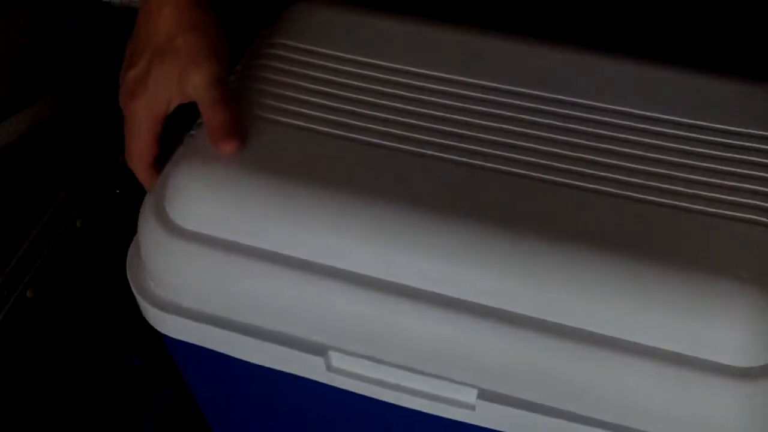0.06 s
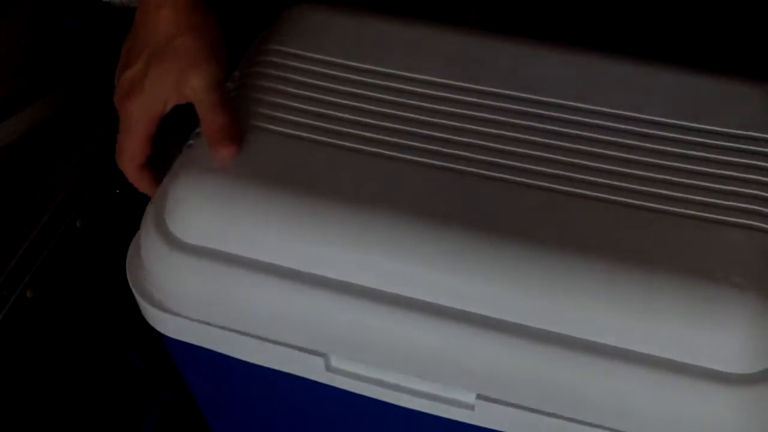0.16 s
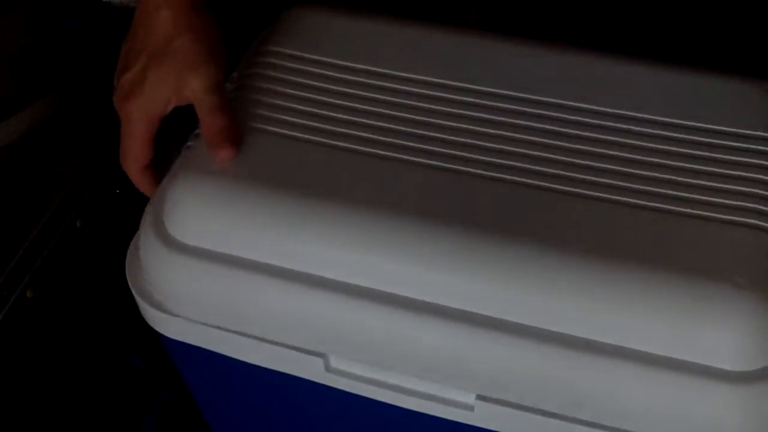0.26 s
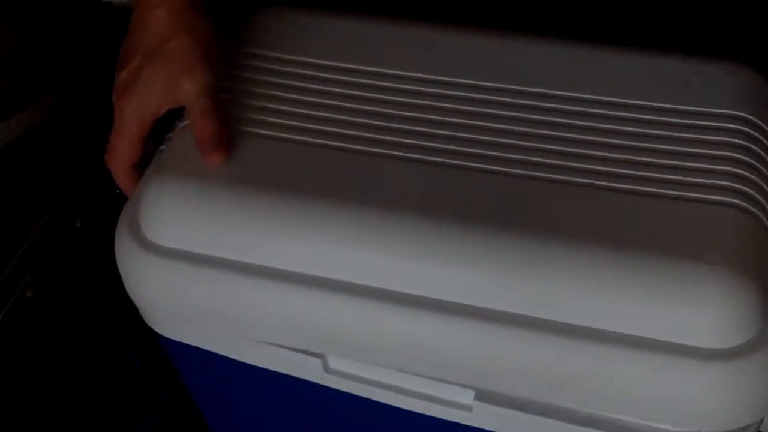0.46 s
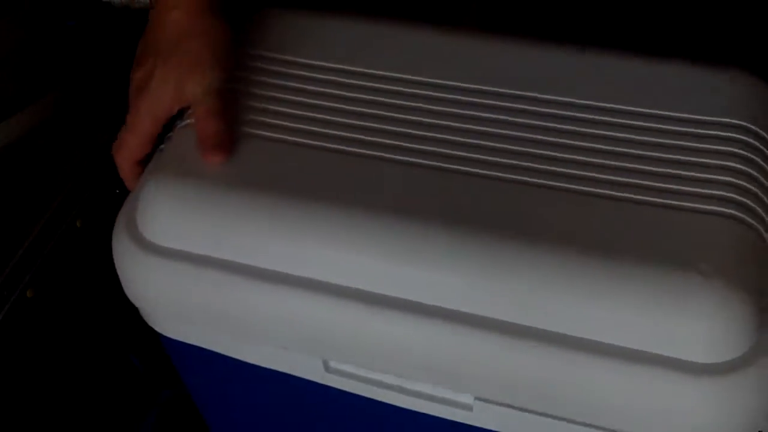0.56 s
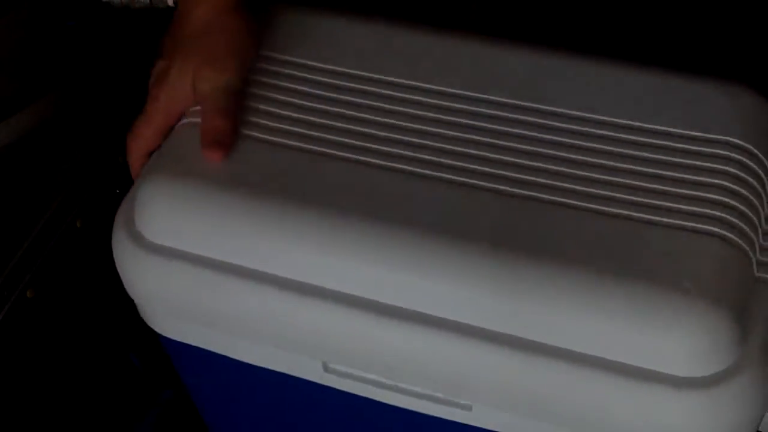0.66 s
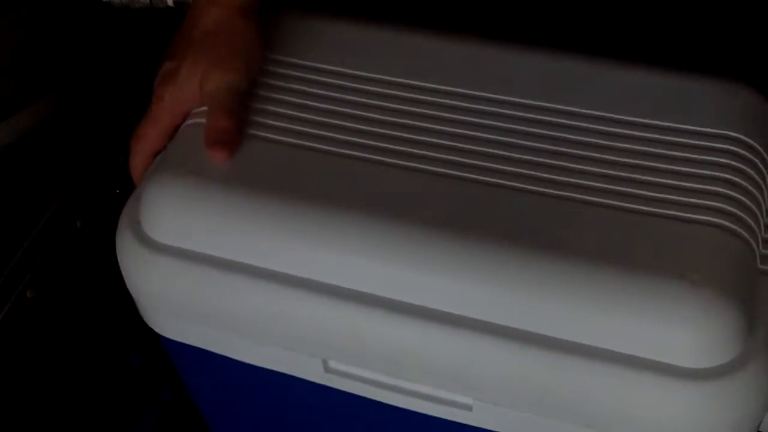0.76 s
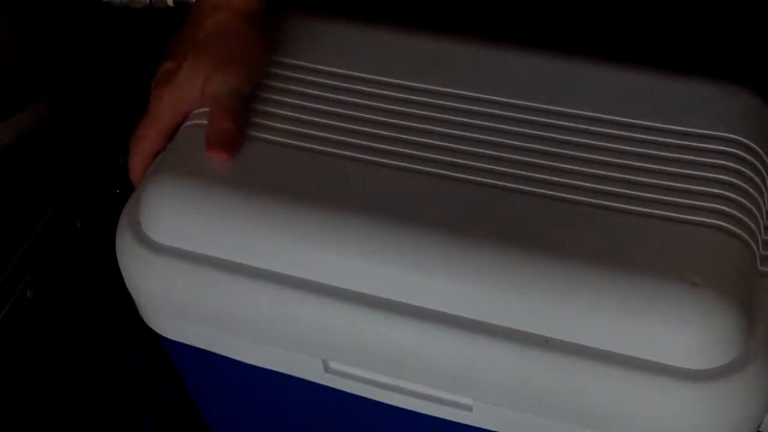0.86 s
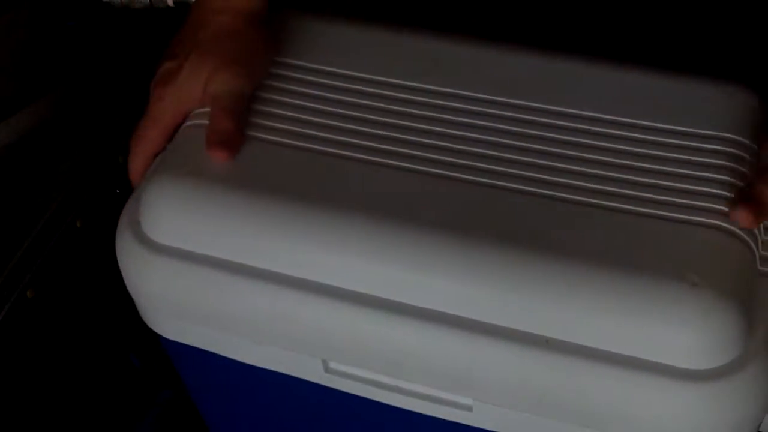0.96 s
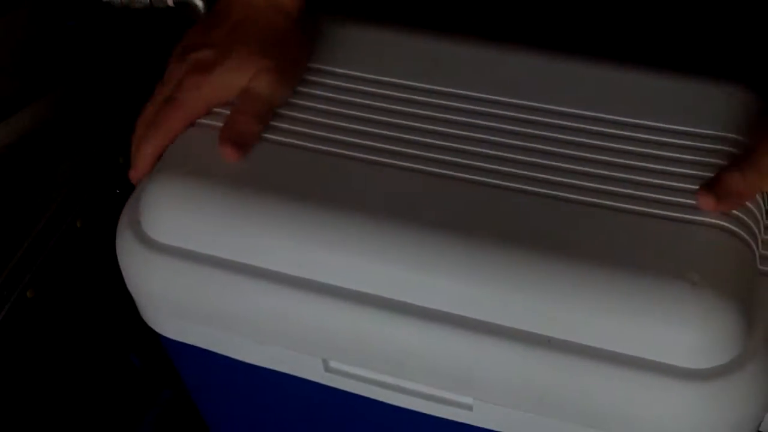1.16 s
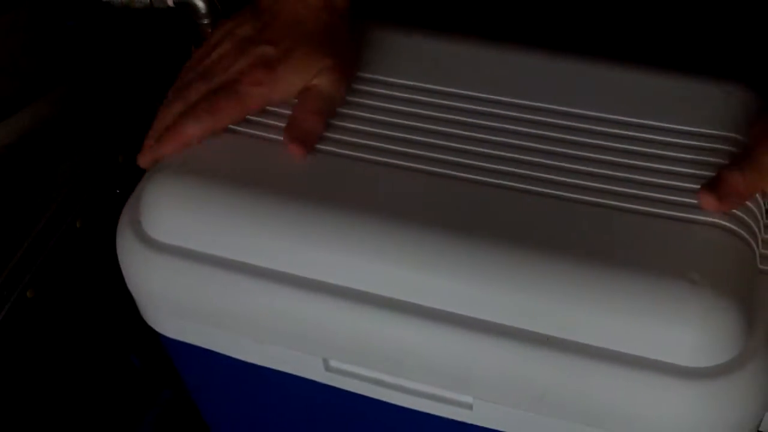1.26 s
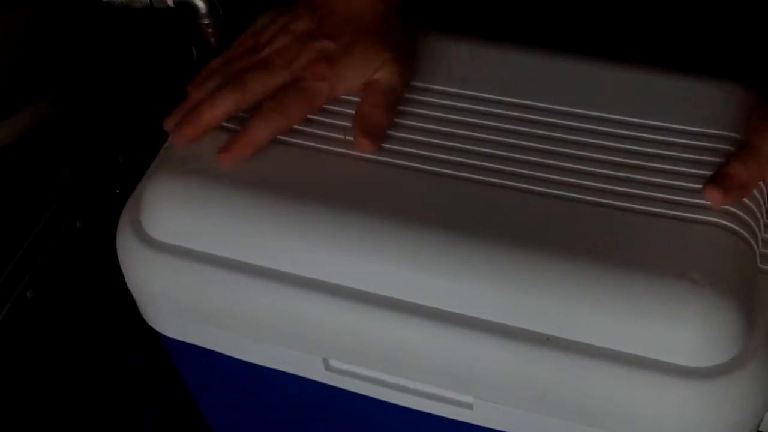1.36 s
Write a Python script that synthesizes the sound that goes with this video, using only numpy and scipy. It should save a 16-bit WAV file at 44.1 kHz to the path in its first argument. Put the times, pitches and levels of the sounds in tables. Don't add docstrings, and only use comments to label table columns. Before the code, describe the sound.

A hollow plastic cooler lid is knocked shut, heard close in a quiet room. Light bumps start at once, a sharp crack hits at 0.2 s, then clustered thumps from 0.36 s lead to a knock at 0.46 s with a brief strap-like buzz. Two hard snaps at 0.68 and 0.72 s seat it with lower thuds. Palms rub the textured top, strongest after 1.15 s, over soft hush and faint whine.

```python
import sys
import numpy as np
from scipy import signal
from scipy.fft import rfft, irfft
from scipy.io import wavfile
from scipy.ndimage import uniform_filter1d

SR = 44100
rng = np.random.default_rng(int(sys.argv[2]) if len(sys.argv) > 2 else 0)


def how_loud(loudness_db):
    steps = np.asarray(loudness_db, float) / 20
    return 10 ** steps


def to_wav(s):
    ch = np.atleast_2d(s).T
    pcm = np.round(np.clip(ch, -1, 1) * 32767)
    wavfile.write(sys.argv[1], SR, pcm.astype(np.int16))


N = 61739
FILTER_HZ = np.fft.rfftfreq(2048, 1 / SR)

# f/Hz, t60/s
ROOM_T60 = [(100, 0.078), (300, 0.34), (1000, 0.26), (3000, 0.34), (6000, 0.077), (10000, 0.12),
            (16000, 0.17)]
# f/Hz, level/dB
BOOM_TONE = [(100, 3), (300, -4), (600, 1), (1200, -4), (3000, -7)]
# f/Hz, level/dB
TAIL_TONE = [(300, -3.5), (1000, -4.5), (2000, -11.5), (3200, -13), (4800, -10), (6300, -8.5),
             (7600, -14.5), (10000, -25), (16000, -47)]
# f/Hz, level/dB per Hz
HUSH_TONE = [(25, -25), (80, 4), (140, -11), (250, -10), (900, -13), (3000, -22.5), (6500, -25.5),
             (16000, -31)]
# f/Hz, level/dB per Hz
SIDE_TONE = [(60, -6), (1000, -4.5), (6000, -6.5), (10000, -3), (15000, -2.5)]
# f/Hz, level/dB
SKEW_TONE = [(30, 14), (125, 4), (300, 8), (600, 7), (2000, 1), (5000, 1), (12000, -2)]
# t/s, level/dB
RUMBLE_LEVEL = [(0, -58), (.18, -48), (.21, -42), (.33, -56), (.4, -36), (.6, -41), (.64, -40), (.7, -40),
                (.83, -34), (.9, -56), (.98, -34), (1.03, -78), (1.4, -77)]
# t/s, level/dB
RUB_LEVEL = [(0, -53), (.16, -63.5), (.181, -41), (.2, -60), (.45, -51), (.64, -48.5), (.77, -41.5),
             (.81, -42.5), (.89, -50), (.94, -39.5), (.957, -49), (.99, -56), (1.008, -41), (1.05, -53.5),
             (1.135, -44.5), (1.19, -36), (1.33, -29.5), (1.4, -33.5)]
# f/Hz, level/dB per Hz
RUB_TONE = [(300, -40), (600, -31), (1600, -24.5), (3600, -14.5), (5500, -11.5), (7000, -8), (10000, -15),
            (16000, -27)]
# f/Hz, half width/Hz, level/dB
CUP = [(1790, 410, 14.8), (4520, 230, 5.7), (405, 55, 27)]
# multiple of strap pitch, level/dB
STRAP_PARTIALS = [(1, 2), (2, 1), (3, -5), (4, -4), (5, -8), (6, -11), (7, -12), (8, -15), (9, -19),
                  (10, -26)]
# t/s, level/dB
STRAP_SWING = [
    (.467, -62),
    (.48, -34),
    (.499, -36.5),
    (.512, -69),
    (.524, -43.5),
    (.556, -64),
    (.575, -65),
    (.62, -60),
    (.7, -110),
]
# t/s, f/Hz, level/dB, t60/s
PINGS = [
    (0.03, 4280, -40, 0.019),
    (0.2042, 2450, -22, 0.017),
    (0.206, 4440, -22, .018),
    (0.2051, 5200, -13, 0.022),
    (.4632, 3950, -26, 0.016),
    (0.6836, 1873, -17, 0.024),
    (.6838, 2420, -24, 0.017),
    (.7193, 3470, -24, 0.02),
]
# t/s, level/dB, t60/s, tilt/dB per octave (positive is brighter)
CRACKS = [(.0135, -28.5, 0.033, -4), (.031, -32.5, 0.03, -5.5), (.2045, -6.5, 0.0094, 2.5),
          (.367, -31, 0.019, -4), (0.371, -33.5, 0.049, -0.5), (0.386, -33.5, 0.093, -3.5),
          (.410, -36.5, 0.053, -3), (.4632, -16.5, 0.011, -2.5), (.468, -30, 0.02, 8),
          (.489, -32, 0.0067, 1), (0.677, -29, 0.1, -2), (.683, -1, 0.0064, 5),
          (0.7196, -15.5, 0.012, -0.7), (0.779, -27, 0.013, -0.5), (1.013, -36.5, 0.035, -4),
          (.6841, -4.5, 0.013, 0), (.6856, -6, 0.012, 1), (0.691, -20, 0.011, 4), (0.21, -22, 0.033, -1.5),
          (.395, -36, 0.022, 2), (.455, -34.5, 0.036, 10), (0.416, -45, 0.1, 10), (0.475, -26, 0.069, -5),
          (0.4855, -29, 0.1, -5.5), (0.519, -47.5, 0.23, -6), (0.408, -28, .012, -8),
          (0.3839, -36, 0.022, 2), (0.775, -31, 0.019, -6)]
# f/Hz, level/dB per Hz
CRACK_TONE = [(500, -10), (1000, 0.5), (1500, -12), (2200, -10.5), (3200, -15.5), (4800, -11.5),
              (7000, -13), (16000, -29.5)]
# f/Hz, width/Hz, level/dB
RIM = [(1740, 200, -4.5), (4300, 860, -2), (5520, 260, -5), (6940, 116, 1.6)]
# t/s, level/dB, lid f/Hz, contact/ms, t60/s
THUMPS = [(0.0129, -20.5, 236, 1.38, 0.042), (0.0329, -31.5, 242, 1.3, 0.027),
          (0.052, -27.5, 229, 2.9, 0.031), (0.1182, -25, 230, 4.15, 0.062), (0.196, -28, 225, 2.6, 0.047),
          (0.2174, -40, 202, 1.7, 0.021), (0.225, -16.5, 208, 1.6, 0.036), (0.2422, -22, 191, 3.4, 0.038),
          (0.296, -39, 207, 4.7, 0.029), (0.359, -31, 204, 1.6, 0.18), (0.3716, -21, 186, 1.5, 0.067),
          (0.3857, -17.5, 252.6, 1.47, 0.18), (0.4078, -19, 231, 2.3, 0.037), (0.4217, -24, 236, 2.3, 0.05),
          (0.4483, -9.5, 245, 7, 0.2), (0.4667, -9.5, 236, 1.24, 0.038), (0.4872, -17, 230.5, 2.77, 0.067),
          (0.54, -27, 230, 3.6, 0.2),
          (0.659, -28.5, 238, 2.6, 0.087),
    (0.708, -34, 207, 1.6, 0.085),
    (0.7359, -19, 204, 1.9, 0.038),
    (0.749, -24, 193, 1.66, 0.13),
    (0.756, -18.5, 181, 1.5, 0.12),
    (.777, -18, 121.2, 5.3, 0.091),
    (.792, -21.5, 163, 2.4, 0.056),
    (0.822, -32, 163, 3.8, 0.13),
    (1.011, -53, 307, 0.45, 0.017),
]
BLOW_TIMES = [.2045, .463, .6833, .719]
# level/dB, lid f/Hz, contact/ms, t60/s
BLOWS = [
    (-3.5, 204.7, 0.98, 0.069),
    (-12, 239, 0.53, 0.046),
    (-6, 198, 0.72, 0.062),
    (-4.5, 201, 1.11, 0.038),
]
# wall f/Hz, level/dB
BLOW_WALL = [
    (1080, 2.5),
    (1027, 0),
    (920, -3),
    (840, -11.5),
]
# multiple of lid pitch, level/dB, share of t60
LID_MODES = [(1, 6.5, 0.7), (.82, -17.5, 1.8), (1.25, -2, 0.19), (2.3, -12, 0.76), (2.75, -16.5, 0.44),
             (3.3, -23.5, 1.1), (1.1, -9.5, 1.97), (.35, -16, 6.3)]
# multiple of wall pitch, level/dB, t60/s
WALL_MODES = [(1, 0.5, 0.019), (.76, -10, 0.023), (1.2, -18, 0.021), (1.4, -12.5, 0.033),
              (2.04, -0.5, 0.0085)]
# f/Hz, half width/Hz, level/dB
CAPSULE = [(6570, 550, 4.5), (11280, 320, -4)]

ROOM_DB, ROOM_CRACK_DB, STRAP_ROOM_DB = -11.5, -4.5, -7
TAIL_T60_S, TAIL_RISE_S, TAIL_TILT_SHARE = 0.27, 0.0096, 0.82
HUSH_DB, SIDE_DB, SKEW_DB = -47, -62, -34
WHINE_HZ, WHINE_DB = 12200, -71
RUMBLE_HZ = 61
RUB_TILT_DB = 0.03
RUB_FLICKER_DB, RUB_PATCH_DB = 0.56, -0.2
CUP_S, CUP_RISE_S = 1.284, 0.074
STRAP_S, STRAP_HZ = 0.43, 918.5
STRAP_SAG, STRAP_JITTER = 0.0077, 0.008
STRAP_WOBBLE_DB = 4.5
RIM_DB = -8
CRACK_RISE_S = 0.00003
LID_CUT_HZ = 225
CEILING, EDGE_HZ = 0.97, 15850


def evened(x):
    return x / np.sqrt(np.mean(x ** 2) + 1e-20)


def read(points, hz):
    f, value = np.transpose(points)
    return np.interp(np.log(hz + 1), np.log(f + 1), value)


def curve(points, t):
    return np.interp(t, *np.transpose(points))


def add(mix, s, sound):
    part = mix[round(s * SR):][:len(sound)]
    part += sound[:len(part)]


def bells(peaks, hz):
    return sum(db / (1 + ((hz - f) / width) ** 2) for f, width, db in peaks)


def colour(x, db):
    cepstrum = irfft(np.log(how_loud(np.maximum(db, -100))))
    cepstrum = cepstrum * np.r_[1, 2 * np.ones(1023), 1, np.zeros(1023)]
    impulse = irfft(np.exp(rfft(cepstrum)))
    return signal.fftconvolve(x, impulse)[:len(x)]


def hiss(db_of):
    hz = np.fft.rfftfreq(512, 1 / SR)[:, None]
    t = np.arange(N // 128 + 5) * 128 / SR
    a, b = rng.standard_normal((len(t), 257, 2)).T
    gain = how_loud(db_of(hz, t)) * np.ones(a.shape)
    return signal.istft(gain * (a + 1j * b), nperseg=512, noverlap=384)[1][:N]


def room(x):
    taps = np.zeros(SR // 2)
    at = np.arange(150, len(taps) - 12, 12)
    taps[at + rng.integers(0, 12, len(at))] = rng.choice([-1., 1.], len(at))
    hz, t, z = signal.stft(taps, SR, nperseg=256)
    decay = how_loud(-60 * t / read(ROOM_T60, hz)[:, None])
    tail = signal.istft(z * decay, SR, nperseg=256)[1]
    return signal.fftconvolve(x, tail / np.linalg.norm(tail))[:N]


def crack_tail(noise, db, t60, tilt_db):
    t = np.arange(len(noise)) / SR
    tilt = TAIL_TILT_SHARE * tilt_db * np.log2((FILTER_HZ + 200) / 5000)
    tone_db = read(TAIL_TONE, FILTER_HZ) + tilt + ROOM_CRACK_DB + 7.5
    wash = noise * np.minimum(t / TAIL_RISE_S, 1) * how_loud(-60 * t / TAIL_T60_S)
    return how_loud(db) * np.sqrt(t60 / TAIL_T60_S) * colour(wash, tone_db)


def quiet():
    hush = how_loud(HUSH_DB) * evened(hiss(lambda hz, t: read(HUSH_TONE, hz)))
    whine = how_loud(WHINE_DB) * np.sin(2 * np.pi * WHINE_HZ * np.arange(N) / SR)
    return hush + whine


def rumble():
    band = signal.butter(2, [27, RUMBLE_HZ], "band", fs=SR)
    low = signal.lfilter(*band, rng.standard_normal(N))
    return how_loud(curve(RUMBLE_LEVEL, np.arange(N) / SR)) * evened(low)


def palms():
    hardest = max(db for s, db in RUB_LEVEL)
    frames = N // 128 + 5
    flicker = RUB_FLICKER_DB * rng.standard_normal(frames)
    patch = rng.standard_normal((frames, 257)).T
    patch = uniform_filter1d(uniform_filter1d(patch, 6, 0), 16, 1)
    patch = RUB_PATCH_DB * evened(patch)
    tone_power = how_loud(2 * read(RUB_TONE, np.fft.rfftfreq(512, 1 / SR)))
    norm = 10 * np.log10(np.mean(tone_power) * 400)

    def rub_db(hz, t):
        pressure = curve(RUB_LEVEL, t)
        tilt = RUB_TILT_DB * (hardest - pressure) * np.log2((hz + 300) / 7000)
        cup = np.clip((t - CUP_S) / CUP_RISE_S, 0, 1) * bells(CUP, hz)
        return read(RUB_TONE, hz) - norm + pressure + flicker + patch + cup + tilt

    return hiss(rub_db)


def strap():
    t, out = np.arange(0, .3, 1 / SR), np.zeros(N)
    drifts = [evened(uniform_filter1d(uniform_filter1d(v, 220), 220))
              for v in rng.standard_normal((11, len(t)))]
    sag = STRAP_SAG * (np.exp(-t / 0.0415) - .4)
    turns = np.cumsum(STRAP_HZ * (1 + sag + STRAP_JITTER * drifts[-1])) / SR
    tone = np.zeros(len(t))
    for (k, db), drift in zip(STRAP_PARTIALS, drifts):
        tone += how_loud(db + STRAP_WOBBLE_DB * drift) * np.sin(2 * np.pi * (k * turns + rng.random()))
    add(out, STRAP_S, how_loud(curve(STRAP_SWING, t + STRAP_S)) * tone)
    return out


def ping(hz, db, t60):
    t = np.arange(2000) / SR
    return how_loud(db - 60 * t / t60) * np.sin(2 * np.pi * hz * t)


def crack(noise, db, t60, tilt_db):
    t = np.arange(len(noise)) / SR
    rim = sum(how_loud(d + RIM_DB) / np.sqrt(1 + (2 * (FILTER_HZ - f) / w) ** 2) for f, w, d in RIM)
    tilt = tilt_db * np.log2((FILTER_HZ + 200) / 5000)
    tone_db = read(CRACK_TONE, FILTER_HZ) + 20 * np.log10(0.23 + rim) + tilt
    tone_db = tone_db - 10 * np.log10(np.mean(how_loud(2 * tone_db)))
    rise = np.minimum(t / (CRACK_RISE_S * how_loud(-db)), 1)
    return how_loud(db) * colour(noise * rise * how_loud(-60 * t / t60), tone_db)


def thump(db, hz, contact_ms, t60, wall_hz=900, wall_db=-19):
    t = np.arange(0, .25, 1 / SR)
    ring = np.zeros(len(t))
    for k, d, share in LID_MODES:
        ring += how_loud(d - 60 * t / (t60 * share)) * np.sin(2 * np.pi * k * hz * t)
    for k, d, ring_s in WALL_MODES:
        ring += how_loud(wall_db + d - 60 * t / ring_s) * np.sin(2 * np.pi * k * wall_hz * t)
    push = np.sin(np.pi * np.clip(t[:300] * 1000 / contact_ms, 0, 1)) ** 2
    pushed = np.convolve(ring, push / push.sum())[:len(t)]
    cut = signal.butter(2, LID_CUT_HZ * hz / 220, "high", fs=SR)
    return how_loud(db) * signal.lfilter(*cut, pushed)


def scene():
    lid, rim = np.zeros(N), np.zeros(N)
    for s, *row in THUMPS:
        add(lid, s, thump(*row))
    for s, row, wall in zip(BLOW_TIMES, BLOWS, BLOW_WALL):
        add(lid, s, thump(*row, *wall))
    for (s, *row), noise in zip(CRACKS, rng.standard_normal((30, 3000))):
        add(rim, s, crack(noise, *row))
    for s, *row in PINGS:
        add(rim, s, ping(*row))
    buzz = strap()
    air = quiet()
    boom = colour(lid, read(BOOM_TONE, FILTER_HZ))
    echoes = room(how_loud(ROOM_DB) * boom + how_loud(STRAP_ROOM_DB) * buzz)
    mid = lid + rim + buzz + echoes + palms() + rumble() + air
    skew = np.convolve(mid, rng.standard_normal(300) / np.sqrt(300))[:N]
    skew = colour(skew, read(SKEW_TONE, FILTER_HZ))
    for (s, *row), noise in zip(CRACKS, rng.standard_normal((30, 12000))):
        add(mid, s, crack_tail(noise, *row))
    side_hush = evened(hiss(lambda hz, t: read(SIDE_TONE, hz)))
    side = how_loud(SIDE_DB) * side_hush + how_loud(SKEW_DB) * skew
    return np.array([mid + side, mid - side])


def roll_off(x):
    return signal.sosfilt(signal.butter(12, 16460, fs=SR, output="sos"), x)


def record(dry):
    capsule_db = bells(CAPSULE, FILTER_HZ)
    heard = np.array([colour(x, capsule_db) for x in dry])
    soft = CEILING * np.tanh(heard / CEILING)
    edge = signal.firwin(255, EDGE_HZ, window=("kaiser", 8), fs=SR)
    mix = signal.oaconvolve(soft, edge[None], "same")
    return roll_off(mix)


dry = scene()
out = record(dry)
to_wav(out)
```